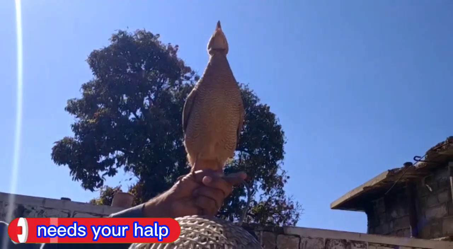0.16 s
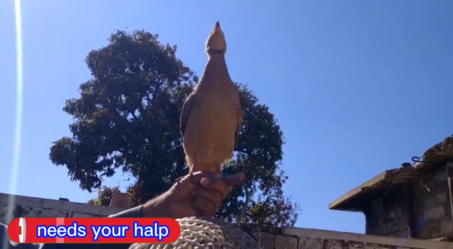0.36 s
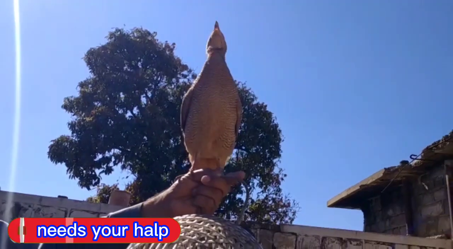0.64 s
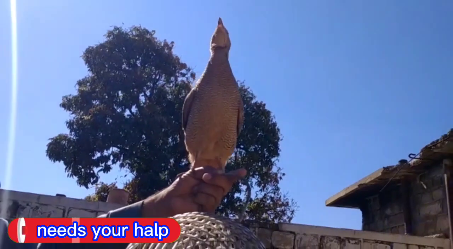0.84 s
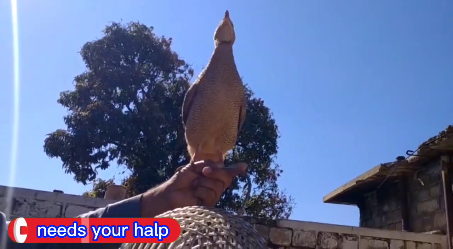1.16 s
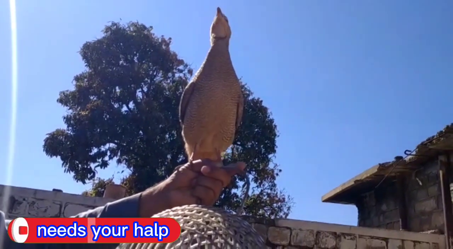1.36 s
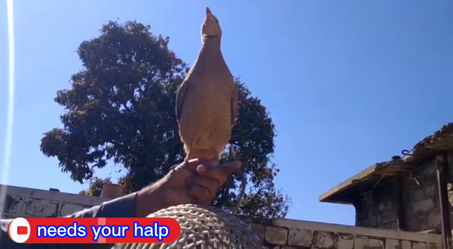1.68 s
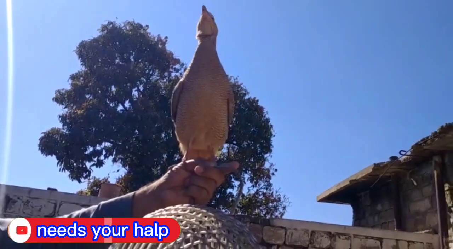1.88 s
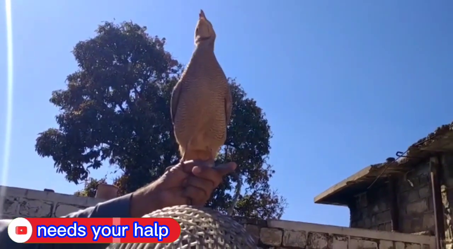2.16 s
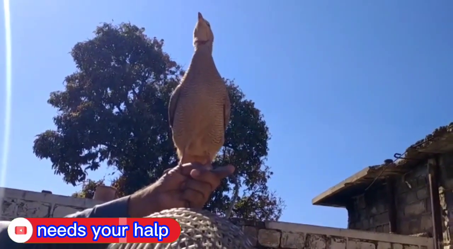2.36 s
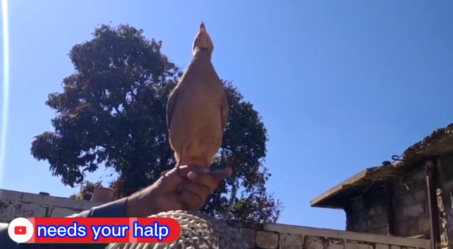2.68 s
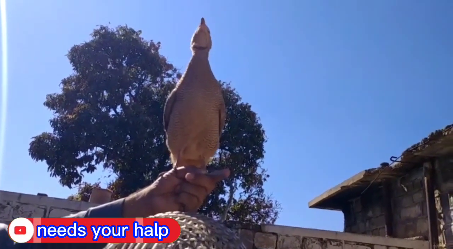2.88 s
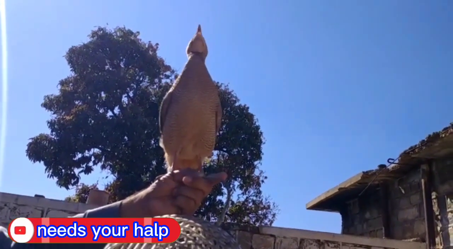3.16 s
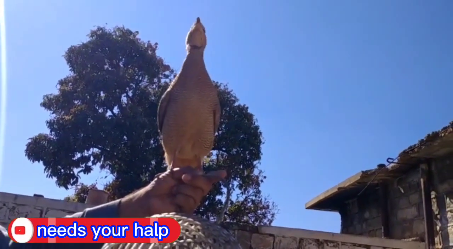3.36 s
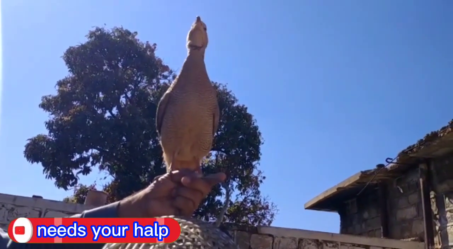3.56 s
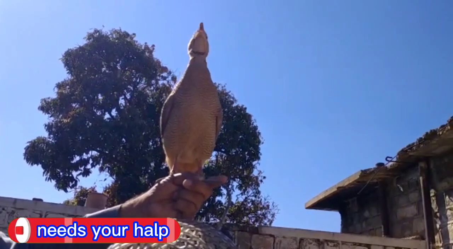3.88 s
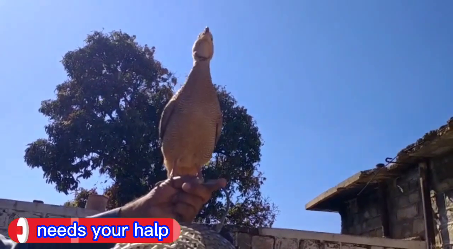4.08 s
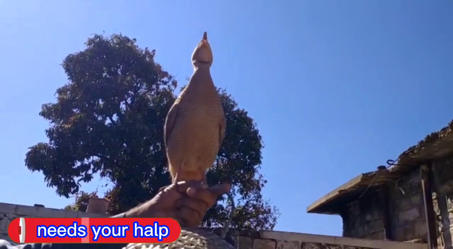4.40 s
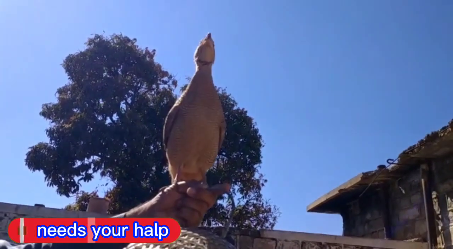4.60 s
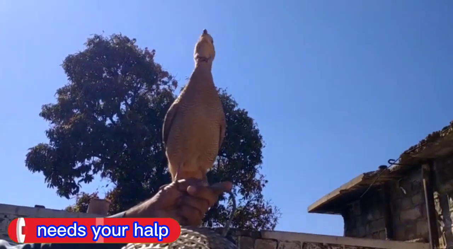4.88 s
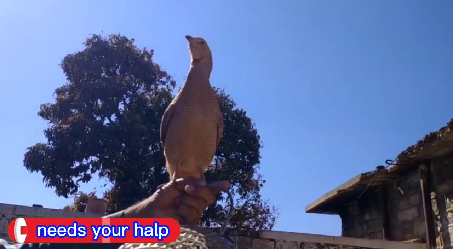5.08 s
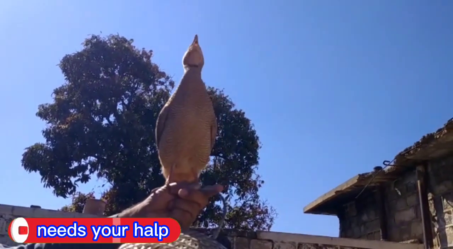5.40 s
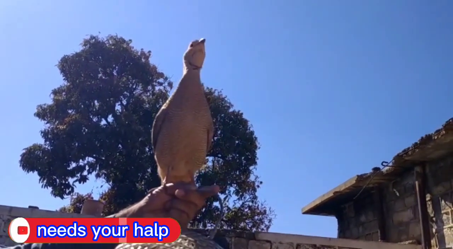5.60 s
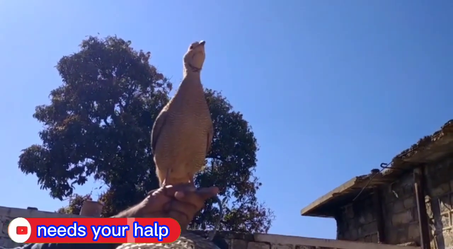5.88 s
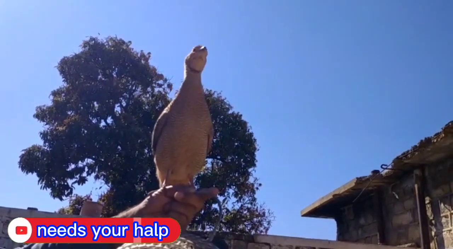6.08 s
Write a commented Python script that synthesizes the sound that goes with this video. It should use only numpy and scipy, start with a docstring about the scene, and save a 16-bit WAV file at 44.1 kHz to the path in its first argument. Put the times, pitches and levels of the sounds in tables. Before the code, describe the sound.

A single gamebird calls at close range in a quiet walled yard. Short hoarse clucks lead to a rasping, piercing shriek and a higher squeal that drops at its end, repeated about twice a second. Late on, the pattern breaks into a fading run of clucks, then slower separate cries. Thin whistles and soft gulps slip between; hard walls ring briefly, and the close phone microphone squashes the loudest notes.

```python
"""Grey francolin calling in a walled yard

Runs of clucks lead into a shriek and a squeal, over and over, with thin whistles, low falling tones and squeaks
around them. Each voiced note sums harmonics weighted by a throat curve; roughness shakes them and adds torn
air. Shriek and squeal start rough and lock into a piercing tone; a falling note closes each squeal. Whistles
are swelling sines; wall echoes and a decaying noise tail make the yard ring over quiet outdoor air. The phone
close by flattens loud notes with a fast limiter, thins the deep bass and cuts the top."""
import sys
import numpy as np
from scipy import signal
from scipy.fft import rfft, irfft, next_fast_len
from scipy.io import wavfile
from scipy.ndimage import uniform_filter1d, minimum_filter1d, map_coordinates

SR = 44100
rng = np.random.default_rng(int(sys.argv[2]) if len(sys.argv) > 2 else 0)


def master(y):
    """Save y as 16-bit WAV."""
    cut = np.clip(np.atleast_2d(y).T, -1, 1)
    pcm = np.round(cut * 32767)  # scale
    wavfile.write(sys.argv[1], SR, pcm.astype(np.int16))


N = 275625

# Note lists; the parts of a call take their levels relative to level_db.
# Shrieks: tone_start_s, tone_length_s, pitch_hz, level_db
SHRIEKS = [(.446, .059, 2320, -2), (1.001, .053, 2350, 0), (1.471, .065, 2360, 0), (2.009, .068, 2360, 0),
           (2.565, .071, 2360, 0), (3.123, .071, 2365, 0), (3.676, .072, 2360, 0), (4.252, .072, 2355, 0),
           (5.268, .07, 2320, -1), (6.079, .071, 2340, -2)]
# Squeals: start_s, pitch_hz, level_db, falling_note_pitch_hz
SQUEALS = [(.174, 1995, -1, 2500), (0.623, 2581, 0.5, 2562), (1.051, 2613, 0.5, 2566),
           (1.612, 2594, -0.5, 2050), (2.17, 2589, -1, 2555), (2.726, 2594, 0, 2528),
           (3.283, 2601, -0.5, 2552), (3.841, 2566, -0.5, 2050), (4.4, 2545, -0.5, 2050),
           (5.459, 2550, -2.5, 2008)]
# Whistles that climb, then break into a higher register: break_s, low_length_s, high_length_s, level_db
WHISTLES = [(.215, .05, .12, -21), (.849, .063, .048, -15), (1.486, 0.0048, 0.086, -19.5),
            (2.096, 0, 0.058, -20.5), (4.511, 0.0015, 0.117, -22.5), (5.119, 0.033, 0.086, -21.5),
            (5.937, .035, .11, -14.5)]
# Soft low falling tones, some sounding under a shriek's tone: start_s, level_db
LOW_FALLS = [(.445, -36.5), (1.384, -46), (2.633, -33), (3.74, -49), (5.044, -45.5), (5.866, -34.5),
             (6.084, -23)]
# Stray falling squeaks: start_s, end_s, first_pitch_hz, last_pitch_hz, level_db
SQUEAKS = [(0.028, .13, 4800, 1600, -55), (0.133, .15, 3200, 2916, -19.5), (5.446, 5.464, 2212, 1960, -7)]
# Runs of hoarse clucks: start_s, count, spacing_s, first_pitch_hz, first_level_db, fade_by_last_db
CLUCK_RUNS = [(.392, 1, 0.12, 479, -18, 0), (.856, 1, .1, 559.7, -21.5, 0),
              (1.259, 2, 0.11, 557, -19.5, -0.5), (1.825, 2, 0.099, 544.4, -17.5, 1),
              (2.378, 2, .101, 531.5, -18.5, 1), (2.937, 2, 0.1, 529.4, -17, 3.5),
              (3.489, 2, .101, 511, -15, 2.5), (4.052, 2, 0.098, 489.8, -14, 3.5),
              (4.611, 5, .1, 469.4, -16.5, 21), (5.639, 3, .095, 439.8, -17.5, 8)]
# Puffs of wind: start_s, end_s, level_db
BREEZE = [(0.995, 1.149, -24), (2.6, 3.097, -36), (3.149, 3.449, -33.5)]

# Gestures of the voice: share_of_length (0-1), pitch_ratio, level_db, roughness (0-1)
RASP = [(0, .98, 0.5, 0.22), (.12, 1.05, -2, 0.2), (.28, 1.25, -0.5, 0.4), (.42, 1.05, -2, .25),
        (.56, .75, -5, 0.15), (.62, 1, -2.5, .14), (.88, 1, 2, 0.24), (1, 1.15, 2, 0.8)]
TONE = [(0, .94, -5, .2), (.06, 1.008, 0, .025), (.5, 1, 0, .025), (.91, .993, 0, .025), (1, .9, -10, .35)]
CROAK = [(0, 0.85, 2, 1), (.25, 1, -7, 0.39), (.7, 1.02, -5.5, 0.46), (1, 1.3, -6.5, 0.32)]
YELP = [(0, .84, -7, .15), (.3, 0.98, 0, 0.093), (.6, 1, -1.5, 0.079), (1, 0.893, -13, 0.27)]
SQUEAL = [(0, .76, 2.9, 0.874), (.09, 1.005, 0, .014), (.5, 1, 0, 0.034), (.9, .992, 0, 0.017),
          (1, 0.829, 1.4, 0.48)]
FALL = [(0, .99, -1.4, 0.3), (.3, 0.98, 0, 0.061), (.7, .92, 0.44, 0.085), (.85, .85, -0.59, 0.29),
        (1, 0.684, -2.8, 0.42)]
CLUCK = [(0, .6, -12, 0.11), (.18, .8, -2, 0.15), (.45, 1.01, 1, .16), (.72, .96, -5, 0.16),
         (1, .8, -16.5, 0.2)]
YIP = [(0, 1.1, -1.5, .1), (.25, 1.01, 0, 0.048), (.7, .94, 0, 0.053), (1, 0.83, -6, 0.086)]
# The croak dying away after a shriek, same columns
RELEASE = [(0, .85, 3.5, .8), (.25, 1, -7.5, 0.3), (.6, 1.02, -11.5, .45), (1, 0.95, -13, .4)]

# Throat and beak resonance in each register: frequency_hz, gain_db
RASP_THROAT = [(250, -34.5), (700, -34), (1100, -3), (1600, -1.5), (2500, 6), (3700, 0), (4700, -3),
               (5700, -4), (7800, -13), (10500, -32), (15500, -31.5)]
TONE_THROAT = [(300, -13.5), (1200, -9), (1900, 7.5), (2400, -1), (4000, -20), (4720, -17.5), (7080, -23),
               (9440, -39.5), (11800, -46), (15500, -47)]
CROAK_THROAT = [(250, -34.5), (750, -19.5), (1050, -2), (1600, -7), (2300, -16), (3300, 4), (4500, -21.5),
                (5700, -1.5), (7500, -10), (10500, -27.5), (15500, -29.5)]
SQUEAL_THROAT = [(400, -21), (1500, -2), (2100, 2.5), (2600, -6), (3600, -16.5), (4500, -13.5), (5200, 1.5),
                 (6300, -56), (7740, -25.5), (10300, -42), (12900, -42), (15500, -32.5)]
LOW_SQUEAL_THROAT = [(300, -19.5), (1200, -3), (2000, 3), (3000, -9.5), (4000, -11), (6000, -19),
                     (8000, -19), (10000, -45), (15500, -39)]
CLUCK_THROAT = [(200, -16.5), (450, -26.5), (900, -12), (1300, -2), (1600, 4.5), (2100, -29), (3000, -22),
                (3900, -31.5), (4900, -19.5), (5600, -25.5), (6600, -49), (10000, -49.5), (13000, -33),
                (15500, -36)]
PURE_THROAT = [(100, -20.5), (1800, 0), (2800, -20), (3300, -24), (5100, -17), (6500, -34.5),
               (15000, -55.5)]

# Noise spectra of air through the beak, low rumble and open air: frequency_hz, gain_db
WHEEZE = [(200, -9), (1000, -5), (2500, 4), (5000, -4.5), (8000, -7), (11000, -17.5), (15000, -21)]
RUMBLE = [(25, -34.5), (55, -40), (90, -1.5), (150, -1), (250, -4.5), (450, -17.5), (900, -16.5),
          (2000, -67)]
AIR = [(30, -19), (120, 0), (400, -3), (1500, -17.5), (4000, -22.5), (9000, -17.5), (15000, -33.5)]

# Colour of the yard's echoes: frequency_hz, gain_db
YARD_COLOUR = [(150, -45.5), (700, -5.5), (1400, 1.5), (2500, 5), (3600, 2), (5000, -2), (6300, -3),
               (7600, 9.5), (10000, 6.5), (15000, -7)]
# Reverberation time of the yard: frequency_hz, t60_s
YARD_DECAY = [(200, 0.19), (1500, 0.43), (2500, 0.52), (7500, 0.28), (15000, 0.41)]
# Single wall echoes: delay_s, level_db
WALLS = [(.013, -19), (0.031, -27), (.047, -21.5), (0.095, -23)]
# Ends of the whistle's glide after the break: first_pitch_hz, last_pitch_hz
HIGH_WHISTLE_HZ = (2554, 2834)

TOP_HZ = 15700  # top of the phone's band
RASP_S, CROAK_S, SWING_S = .049, 0.0407, .022  # rasp before a shriek's tone, croak after, swing on either side
YELP_LEAD_S, YELP_S, SQUEAL_S = .04, .014, .046  # the yelp's lead on the squeal; their lengths
FALL_AFTER_S, FALL_S, FALL_DB = .067, .034, -11.5  # delay from the squeal's start, length, relative level
REGISTER_HZ = 2200  # above this pitch a squeal's octave dominates
CLUCK_SAG, FADE_CURVE = .925, 3.17  # pitch of each cluck over the one before; the fade comes late in a run
CLUCK_S_PER_HZ = .000108  # higher clucks last longer
YIP_DELAY_S, YIP_S, YIP_RATIO = .024, 0.0278, 3.13  # longest delay, length, pitch over the cluck's
YIP_EARLY_S_PER_HZ = .00013  # a lower cluck yips sooner
YIP_FULL_HZ, YIP_DB, YIP_DB_PER_HZ = 540.6, -2, 0.33  # full strength from this cluck pitch up, weaker below
LOW_WHISTLE_HZ, CLIMB_HZ_PER_S = 2130, 8000  # pitch at the break; average climb toward it
LOW_WHISTLE_DB = 5.5  # level over the high part


def amp(db):
    """Level law: decibels to amplitude gain."""
    return 10 ** (np.asarray(db) / 20)


def unit(x):
    """Normalisation: scale to rms 1."""
    return x / np.sqrt(np.mean(x ** 2) + 1e-20)


def along(points, hz):
    """Logarithmic frequency: interpolate (Hz, value) points on a log axis."""
    f, v = np.transpose(points)
    return np.interp(np.log(hz + 1), np.log(f + 1), v)


def wobble(n, rate):
    """Band-limited randomness: a smooth curve of n samples through `rate` random knots a second."""
    knots = rng.standard_normal(int(n * rate / SR) + 4)
    return map_coordinates(knots, [np.arange(n) * rate / SR])


def filtered(x, response):
    """Linear filtering: multiply the spectrum of x by a response of frequency."""
    m = next_fast_len(len(x) + SR // 20)
    return irfft(rfft(x, m) * response(np.fft.rfftfreq(m, 1 / SR)), m)[:len(x)]


def noise(n, spectrum):
    """Spectral shaping: coloured noise of rms 1."""
    return unit(filtered(rng.standard_normal(n), lambda hz: amp(along(spectrum, hz))))


def add(track, start, x):
    """Superposition: mix x into the track at a time in seconds."""
    part = track[round(start * SR):][:len(x)]
    part += x[:len(part)]


def arch(start, end):
    """Envelope: a half-sine swell lasting from start to end."""
    n = max(round((end - start) * SR), SR // 200)
    return np.abs(np.sin(np.linspace(0, np.pi, n)))


def puff(start, end, db, spectrum):
    """Turbulence: a swell of coloured noise; returns its start and its sound."""
    size = arch(start, end)
    return start, amp(db) * size * noise(len(size), spectrum)


def note(start, end, hz, db, gesture, throat, split=0, jitter=0.055, turbulence=0.95, edge=0.0018):
    """Source and filter: harmonics of the syrinx weighted by the throat; returns start and sound."""
    n = max(round((end - start) * SR), SR // 200)
    share, *columns = np.transpose(gesture)
    ratio, level_db, rough = [np.interp(np.linspace(0, 1, n), share, c) for c in columns]
    wander, patchy_db = .1, 5
    # a rough voice shakes quickly and strays more slowly from its pitch
    stray = jitter * wobble(n, 1300) + wander * wobble(n, 169.0)
    pitch = hz * ratio * (1 + rough * stray)
    phase = 2 * np.pi * np.cumsum(pitch) / SR
    k = np.arange(1, int(TOP_HZ / max(hz, 200)) + 2)[:, None]
    # roughness also varies each harmonic's level independently
    swing_db = patchy_db * np.tanh(6 * rough) * np.array([wobble(n, 143) for _ in k])
    audible = k * pitch < SR / 2
    gains = amp(along(throat, k * pitch) + swing_db) * audible
    voiced = np.sum(gains * np.sin(k * phase + rng.uniform(0, 2 * np.pi, k.shape)), 0)
    # alternately strong and weak cycles put lines halfway between the harmonics
    voiced = unit(voiced * (1 + split * np.sin(phase / 2)))
    # air tears through the membranes once a cycle
    rush = turbulence * rough * noise(n, throat) * (1 + np.cos(phase))
    t = np.arange(n) / SR
    fade = np.clip(np.minimum(t, t[::-1]) / edge, 0, 1)
    return start, amp(db + level_db) * fade * unit(voiced + rush)


def glide(start, end, first_hz, last_hz, db, flutter=0.061, blur=0, bend=1.423, swell=2):
    """Modulation: a swelling, fluttering sine; bend above 1 levels its slide off, blur makes it hoarse."""
    size = np.tanh(swell * arch(start, end)) / np.tanh(swell)
    n = len(size)
    size = size * (1 + flutter * wobble(n, 269.0))
    pitch = last_hz + (first_hz - last_hz) * np.linspace(1, 0, n) ** abs(bend)
    pitch = pitch * (1 + blur * wobble(n, 900))
    return start, amp(db) * np.sqrt(2) * size * np.sin(2 * np.pi * np.cumsum(pitch) / SR)


def register(hz):
    """Vocal register: the throat shape that goes with a squeal's pitch."""
    return SQUEAL_THROAT if hz > REGISTER_HZ else LOW_SQUEAL_THROAT


def background(air_db=-61):
    """Ambient noise: steady outdoor air and low puffs of wind on the microphone."""
    out = amp(air_db) * noise(N, AIR)
    for row in BREEZE:
        add(out, *puff(*row, RUMBLE))
    return out


def squeaks():
    """Frequency modulation: falling sines made hoarse by random pitch shake."""
    out = np.zeros(N)
    for row in SQUEAKS:
        add(out, *glide(*row, flutter=0.24, blur=0.054, bend=.75))
    return out


def squeals():
    """Mode locking: a yelp and rattle lead into a clear tone, which breaks up before a falling note."""
    out = np.zeros(N)
    for start, hz, db, fall_hz in SQUEALS:
        yelp, end, fall = start - YELP_LEAD_S, start + SQUEAL_S, start + FALL_AFTER_S
        add(out, *note(yelp, yelp + YELP_S, hz * .745, db - 19, YELP, RASP_THROAT))
        add(out, *note(yelp + YELP_S - .001, start + 0.0054, hz * 0.35, db - 14.0, CROAK, RASP_THROAT,
                       split=0.17, turbulence=0.28))
        add(out, *note(start, end, hz, db - 11.0, SQUEAL, register(hz)))
        if hz > REGISTER_HZ:
            # the other side of the syrinx sinks in pitch and beats with the squeal in a low rising tone
            add(out, *glide(start, end, hz - 350, hz - 630, db - 35.5))
            add(out, *glide(start, end, 350, 635, db - 25, flutter=0.42, blur=0.13))
        # break-up an octave below
        add(out, *note(end - .002, end + 0.024, hz / 2, db - 18.5, CROAK, SQUEAL_THROAT,
                       split=1.0, turbulence=2.0))
        add(out, *note(fall, fall + FALL_S, fall_hz, db + FALL_DB, FALL, register(fall_hz), turbulence=1.02))
    return out


def whistles():
    """Register break: a climbing sine jumps to a higher one, under a wheeze of turbulent air."""
    out = np.zeros(N)
    for jump, low_s, high_s, db in WHISTLES:
        if low_s > 0:
            first_hz = LOW_WHISTLE_HZ - CLIMB_HZ_PER_S * low_s
            add(out, *glide(jump - low_s, jump, first_hz, LOW_WHISTLE_HZ, db + LOW_WHISTLE_DB,
                            bend=1.1, swell=.8))
        add(out, *glide(jump, jump + high_s, *HIGH_WHISTLE_HZ, db))
        add(out, *puff(jump - low_s, jump + high_s + 0.03, -38, WHEEZE))
    return out


def clucks():
    """Effort and pitch: each cluck of a run is lower and shorter; the higher it is, the stronger its yip."""
    out = np.zeros(N)
    for first, count, spacing, first_hz, db, fade_db in CLUCK_RUNS:
        for k, progress in enumerate(np.linspace(0, 1, round(count))):
            start = first + k * spacing
            hz = first_hz * CLUCK_SAG ** k
            faded_db = fade_db * progress ** FADE_CURVE
            add(out, *note(start, start + CLUCK_S_PER_HZ * hz, hz, db - faded_db, CLUCK, CLUCK_THROAT,
                           jitter=0.14, turbulence=1.0))
            short_hz = max(YIP_FULL_HZ - hz, 0)
            yip = start + YIP_DELAY_S - YIP_EARLY_S_PER_HZ * short_hz
            yip_db = YIP_DB - YIP_DB_PER_HZ * short_hz - faded_db
            add(out, *note(yip, yip + YIP_S, hz * YIP_RATIO, yip_db, YIP, PURE_THROAT,
                           jitter=0.56, edge=0.0051))
    return out


def shrieks():
    """Period doubling in reverse: a rasp jumps an octave into a clean tone, then drops to a short croak."""
    out = np.zeros(N)
    for start, length, hz, db in SHRIEKS:
        end = start + length
        add(out, *note(start - RASP_S, start + .002, hz * .483, db - 18, RASP, RASP_THROAT,
                       split=0.46, jitter=0.047, turbulence=0.96))
        add(out, *note(start, end, hz, db - 3.5, TONE, TONE_THROAT))
        add(out, *note(end - .003, end + CROAK_S, hz * 0.42, db - 21.0, RELEASE, CROAK_THROAT,
                       split=0.033, turbulence=3.3))
        # just before and after the tone the membranes swing cleanly, about an octave lower
        add(out, *glide(start - SWING_S, start, hz * .47, hz * 0.482, db - 25))
        add(out, *glide(end + 0.00208, end + SWING_S, hz * 0.5, hz * 0.46, db - 26.5))
    return out


def low_falls():
    """Frequency modulation: low hoarse sines fall by about an octave."""
    out = np.zeros(N)
    for start, db in LOW_FALLS:
        add(out, *glide(start, start + .06, 352, 169, db, flutter=.4, blur=.14))
    return out


def yard(x, wet_db=-12, gap=0.008):
    """Reverberation: single echoes from the nearest walls and a diffuse tail that builds over `gap` s."""
    hz, t, z = signal.stft(rng.standard_normal(SR * 3 // 4), SR, nperseg=256)
    decay = amp(-60 * t / along(YARD_DECAY, hz)[:, None])
    buildup = 1 - np.exp(-t / gap)
    tail = signal.istft(z * (decay * buildup), SR, nperseg=256)[1]
    answer = amp(wet_db) * tail / np.linalg.norm(tail)
    for delay, db in WALLS:
        answer[round(delay * SR)] += amp(db)
    echoes = signal.fftconvolve(x, answer)[:N]
    return filtered(echoes, lambda f: amp(along(YARD_COLOUR, f)))


def scene(shriek_send_db=-7, squeal_send_db=3.0, flutter_db=-31):
    """Superposition: bird, echoes and air; a low flutter follows the loudness of shrieks and squeals."""
    shriek, squeal = shrieks(), squeals()
    small = clucks() + squeaks() + whistles() + low_falls()
    echoes = yard(amp(shriek_send_db) * shriek + amp(squeal_send_db) * squeal + small)
    loudness = uniform_filter1d(np.abs(shriek + squeal), size=200)
    flutter = amp(flutter_db) * loudness * noise(N, RUMBLE)
    return (shriek + squeal + small + echoes + flutter + background())[None]


def limiter(x, hold=0.0095):
    """Gain control: a fast limiter that listens mostly to the treble, so high notes are held lower."""
    ceiling, corner_hz = .88, 2100
    # the sensing boost rises above the corner and rolls off past half the band
    sensed = np.abs(filtered(x, lambda hz: 1 + 1j * hz / corner_hz / (1 + (hz / TOP_HZ * 2) ** 4)))
    width = max(round(hold * SR), 2)
    needed = minimum_filter1d(np.minimum(1, ceiling / (sensed + 1e-9)), width)
    return x * uniform_filter1d(needed, width)


def record(dry, bass_hz=75):
    """Band limiting: the phone limits peaks, sheds the deep bass and keeps nothing above its band."""
    thinned = filtered(limiter(dry[0]), lambda hz: hz ** 2 / np.sqrt(hz ** 4 + bass_hz ** 4))
    return filtered(thinned, lambda hz: hz < TOP_HZ)[None]


dry = scene()
out = record(dry)
master(out)
```